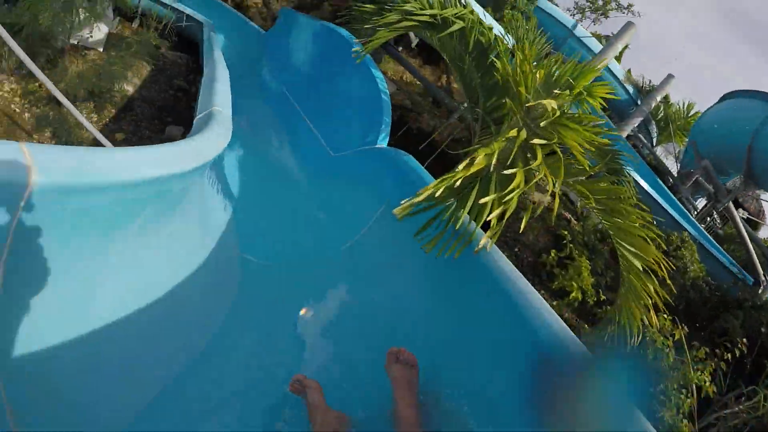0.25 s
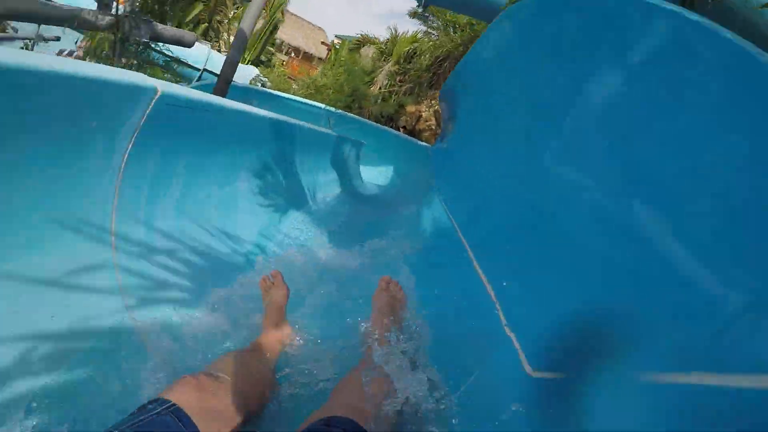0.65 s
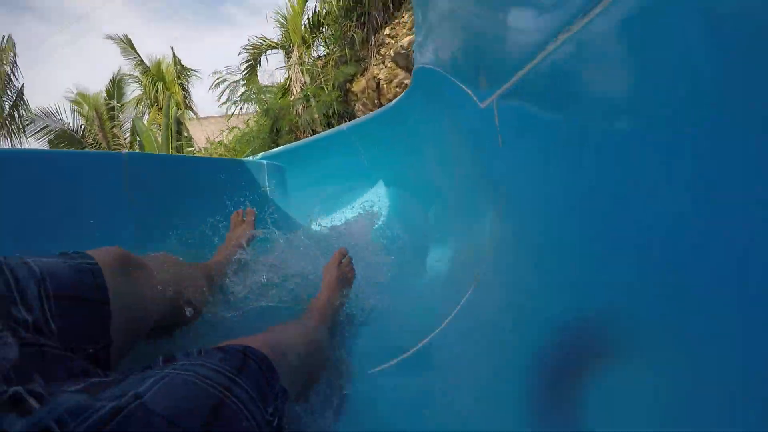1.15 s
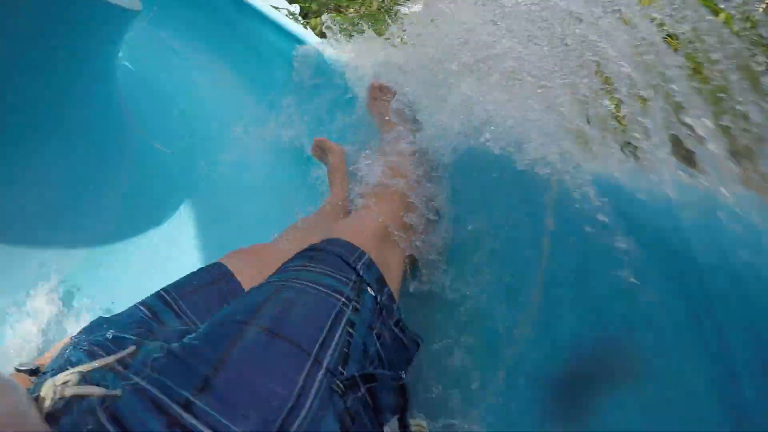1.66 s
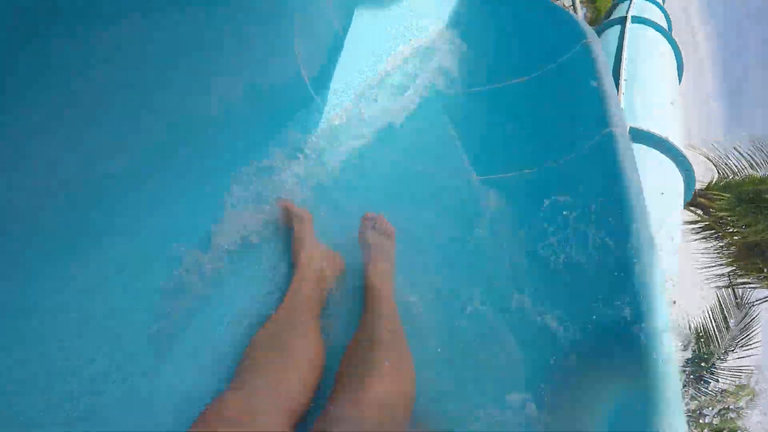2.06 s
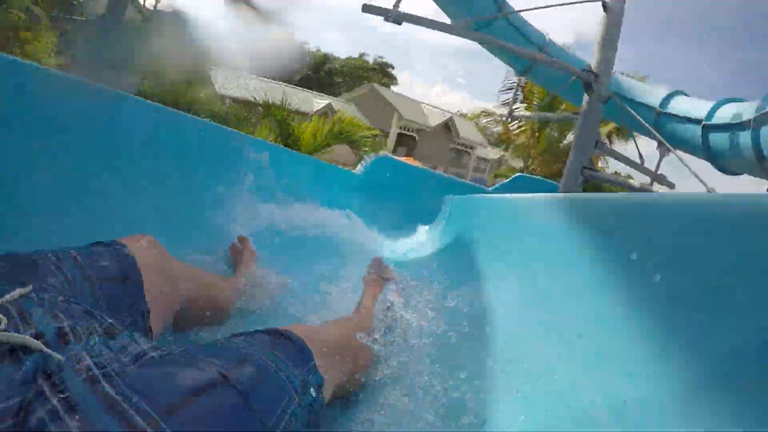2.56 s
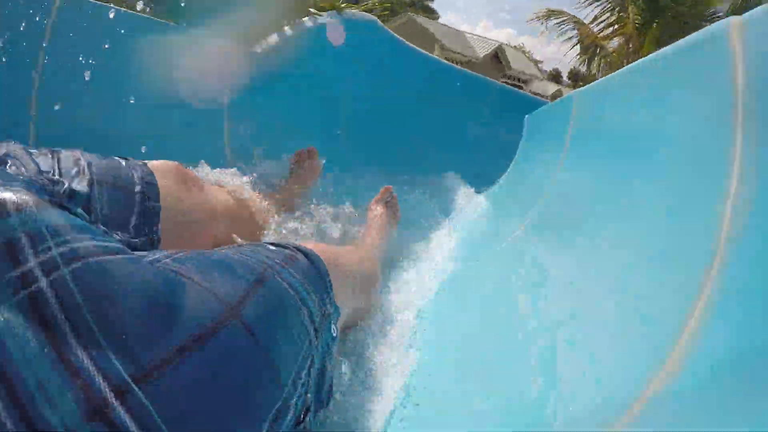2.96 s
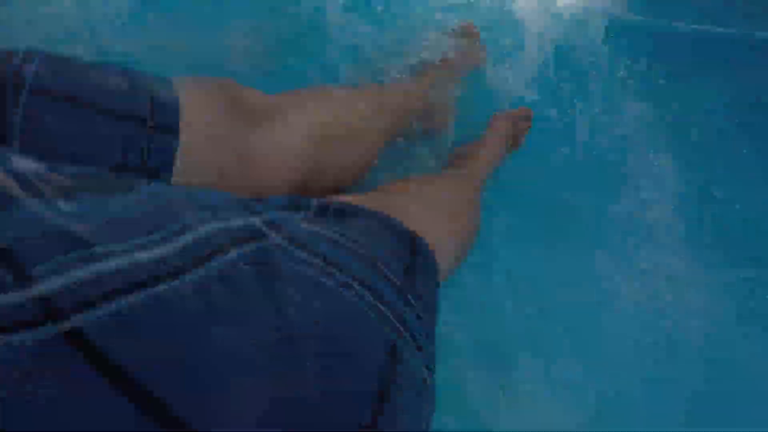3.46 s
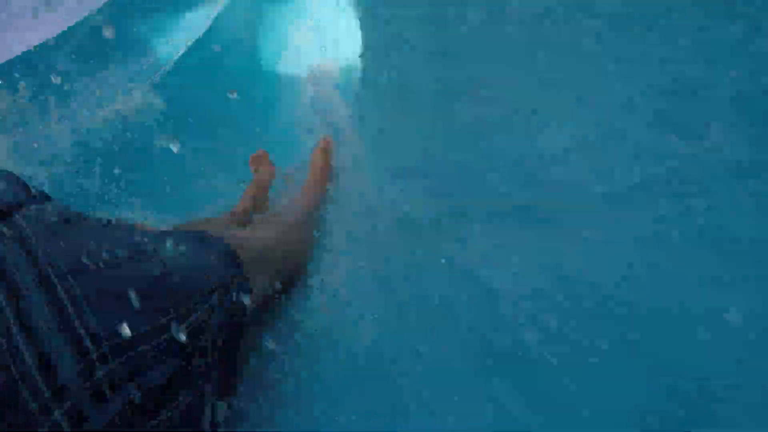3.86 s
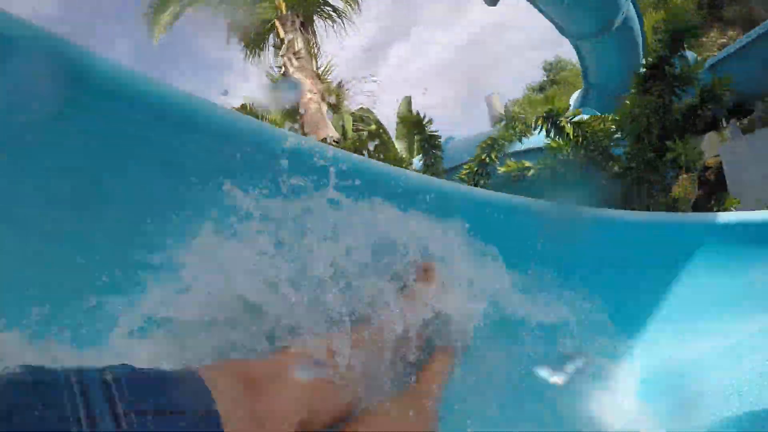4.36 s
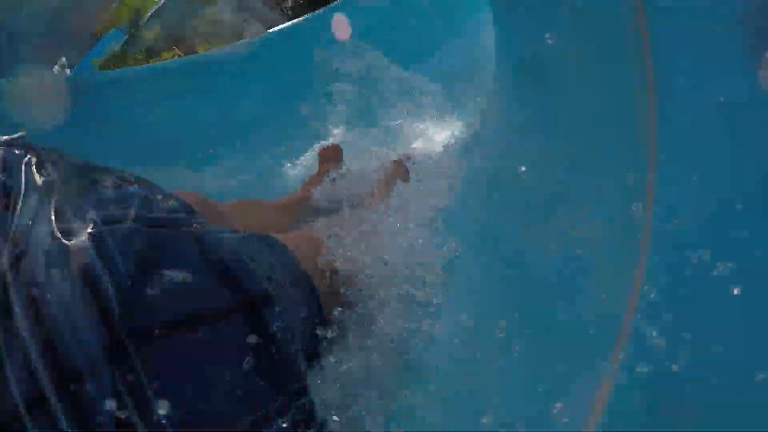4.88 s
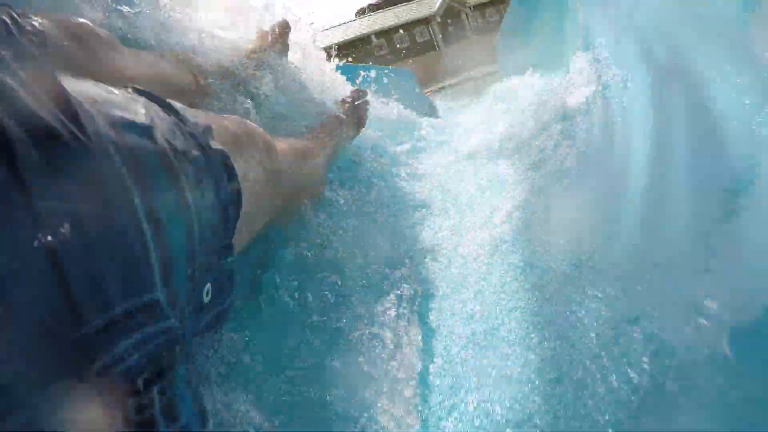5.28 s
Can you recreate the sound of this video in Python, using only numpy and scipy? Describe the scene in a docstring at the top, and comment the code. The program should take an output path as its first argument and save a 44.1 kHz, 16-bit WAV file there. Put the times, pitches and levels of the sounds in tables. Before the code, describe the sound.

Water rushes and churns around a rider on an open water slide for about five and a half seconds, heard very close through a waterproof camera housing. A fizzing hiss, a low gurgle and fine spray swell in the bends, over rumbling wind gusts and irregular deep thumps that set the trough booming. It starts moderately, then surges at 1 second with a splash and a run of heavy thumps lasting until 1.7. After a dip, another surge with thumps, splashes and a gust comes at 2.4. The water eases, with a few knocks around 3.1, then peaks at 3.6 with hard splashes, thumps and one sharp, bright crack. From 3.8 to 3.9 the water is briefly muffled. Drops snap and plink on the housing from 4 to 4.2. The rush continues with soft low thumps around 4.6 and 5, and a last thump and splash near 5.4.

```python
"""Water rushes, churns and sprays around the legs of a rider shooting feet first down an open water slide.
The microphone rides along at arm's length or less, inside a hand-held camera's waterproof housing.
Moving air buffets the shell, water and gusts thump it, splashes break on it and drops crack against it.
The fibreglass trough booms just below, and for a moment a film of water muffles the rush and churn."""
import sys
import numpy as np
from scipy import signal
from scipy.fft import rfft, irfft, next_fast_len
from scipy.io import wavfile
from scipy.ndimage import uniform_filter1d, map_coordinates

SR = 44100
rng = np.random.default_rng(int(sys.argv[2]) if len(sys.argv) > 2 else 0)


def put_to_file(sound):
    """Save the sound as 16-bit audio at rate SR, in the file named by the first command-line argument."""
    columns = np.atleast_2d(sound).T  # one column per channel
    safe = np.clip(columns, -1, 1)
    whole_steps = np.round(safe * 32767)
    wavfile.write(sys.argv[1], SR, whole_steps.astype(np.int16))


N = 243431


def amp(db):
    """Decibels to gain."""
    return 10 ** (np.asarray(db) / 20)


def unit(x):
    """x at rms 1."""
    return x / np.sqrt(np.mean(x ** 2) + 1e-20)


def shape(points, hz):
    """Gain of (Hz, dB) points joined on a log axis."""
    f, db = np.transpose(points)
    return amp(np.interp(np.log(hz + 1), np.log(f + 1), db))


def curve(rows):
    """(seconds, value) points joined into one value per sample."""
    return np.interp(np.arange(N) / SR, *np.transpose(rows))


def wobble(rate):
    """A smooth random curve, rate knots a second."""
    return map_coordinates(rng.standard_normal(int(N * rate / SR) + 4), [np.arange(N) * rate / SR])


def filtered(x, response):
    """x times a response of frequency."""
    m = next_fast_len(len(x) + SR // 8)
    return irfft(rfft(x, m) * response(np.fft.rfftfreq(m, 1 / SR)), m)[:len(x)]


def resonances(modes, hz):
    """Response of (Hz, width, dB) modes on top of what passes straight through."""
    return 1 + sum(amp(db) * 1j * hz * width / (centre ** 2 - hz ** 2 + 1j * hz * width)
                   for centre, width, db in modes)


def add(track, start, sound):
    """Mix a sound into the track at start seconds."""
    room = track[max(round(start * SR), 0):][:len(sound)]
    room += sound[:len(room)]


# The trough, just under the rider. Each row: resonance in Hz, width in Hz, gain in dB.
TROUGH_MODES = [(215.2, 31.4, 4), (387, 70, -20)]

def trough(sound):
    """Low blows and churning set the fibreglass booming."""
    return filtered(sound, lambda hz: resonances(TROUGH_MODES, hz))


# The shell around the microphone. Each row: resonance in Hz, width in Hz, gain in dB.
HOUSING_MODES = [(1110, 460, -17), (2070, 110, -8), (3230, 400, -8.5), (4470, 580, -7), (6720, 160, -8.5),
                 (8010, 510, 1.5), (10660, 550, -8), (13100, 900, -1)]

def housing(hz):
    """The colour that the plastic shell gives to the water outside."""
    return np.abs(resonances(HOUSING_MODES, hz))


def hiss(spectrum, samples=N):
    """Water noise as heard from inside the housing, at rms 1."""
    return unit(filtered(rng.standard_normal(samples), lambda hz: shape(spectrum, hz) * housing(hz)))


# Gusts right on the housing. Each row: time in seconds, level in dB.
GUSTS = [(0, -26.5), (.35, -30.5), (.52, -18.5), (.8, -17), (.95, -27.5), (1.1, -11.5), (1.3, -23.5),
         (1.7, -18), (1.83, -31), (2.2, -27.5), (2.48, -12.5), (2.65, -33), (3.05, -31.5), (3.62, -12.5),
         (3.86, -37), (4.17, -18.5), (4.32, -44), (4.65, -16), (4.9, -30), (5.52, -19)]
# Their rumble at the microphone. Each row: frequency in Hz, relative level in dB.
BUFFET_SPECTRUM = [(10, -30), (20, 0.5), (30, 4), (48, -7), (70, -15), (120, -31), (220, -42.5), (500, -79)]

def buffet(uneven_db=2.5):
    """Eddies of air roll over the housing as slow swings of pressure."""
    eddies = signal.hilbert(filtered(rng.standard_normal(N), lambda hz: shape(BUFFET_SPECTRUM, hz)))
    power = uniform_filter1d(np.abs(eddies) ** 2, size=SR // 16)
    steady_rumble = unit(eddies.real / np.sqrt(np.abs(power) + 1e-20))
    return amp(curve(GUSTS) + uneven_db * wobble(9)) * steady_rumble


# Low thumps on the housing: quick knocks of water and slow, soft whumps of air.
# Each row: start in seconds, level in dB, first pitch in Hz.
THUMPS = [(.115, -20.5, 125), (0.476, -11.5, 86.4), (0.726, -5, 59), (.775, -7, 70), (1.032, 2, 172),
          (1.289, 2.5, 159), (1.395, 0.5, 146), (1.405, -3, 50.3), (1.546, 0.5, 76), (1.727, -4.5, 45),
          (2.388, -1.5, 80), (2.403, 1.5, 152), (2.793, -24.5, 230), (3.105, -21, 191), (3.115, -1, 59),
          (3.203, -9.5, 124), (3.331, -5, 40), (3.572, -1, 76), (3.604, -2, 117), (3.702, 1.5, 153),
          (3.788, -4.5, 212), (3.929, -14, 151), (4.017, -10.5, 140), (4.167, -6.5, 126), (4.19, -2, 45.7),
          (4.585, 2, 40.3), (4.733, -1.5, 37.4), (5.028, -10, 200), (5.044, 0, 43), (5.369, 2, 37.3)]

def thumps(relaxed_hz=34.6, scatter_octaves=0.15, sag_s=0.0062, slow_t60=0.22, rise_cycles=0.24):
    """Each thump is a push that relaxes: a low swing whose pitch falls quickly."""
    out, t = np.zeros(N), np.arange(SR // 4) / SR
    for start, db, first_hz in THUMPS:
        last_hz = relaxed_hz * 2 ** (scatter_octaves * rng.standard_normal())
        hz = last_hz + (first_hz - last_hz) * np.exp(-t / sag_s)
        t60 = slow_t60 / (1 + (first_hz / 158) ** 3)  # a quick push at 158 Hz lasts half as long
        swell = 1 - np.exp(-t * first_hz / rise_cycles)  # slow pushes start softly
        add(out, start, amp(db - 60 * t / t60) * swell * np.sin(2 * np.pi * np.cumsum(hz) / SR))
    return out


# Splashes on the shell. Each row: start in seconds, level in dB, length in seconds, air pocket in Hz.
SPLASH_HITS = [(1.0318, -10.5, 0.0037, 523), (1.31, -19.5, 0.016, 655), (1.404, -20.5, 0.012, 1210),
               (1.623, -26.5, 0.019, 360), (1.742, -30.5, 0.011, 2420), (2.377, -25, 0.032, 3280),
               (2.403, -18.5, 0.01, 634), (2.442, -25.5, 0.03, 596), (2.506, -31.5, .017, 1900),
               (2.803, -37.5, 0.027, 555), (3.098, -30.5, 0.0053, 594), (3.199, -29.5, 0.0082, 340),
               (3.532, -28, 0.049, 1150), (3.6, -18, 0.0042, 1500), (3.611, -8, 0.0023, 655),
               (3.622, -7, 0.0032, 497), (3.665, -22, 0.021, 760), (3.705, -13.5, 0.0026, 570),
               (3.766, -30, 0.015, 820), (4.028, -22.5, .016, 1690), (4.06, -23, .009, 870),
               (4.17, -26, .012, 3220), (4.507, -34.5, 0.029, 645), (4.556, -29.5, 0.03, 3120),
               (4.607, -31.5, 0.012, 580), (4.824, -30.5, 0.07, 1370), (4.971, -33, 0.029, 1940),
               (5.39, -19, 0.011, 577), (5.436, -28, .014, 1930)]
# Their common colour, close up. Each row: frequency in Hz, relative level in dB.
SPLASH_SPECTRUM = [(120, 0.5), (220, 4.5), (330, -2), (520, -1), (850, -4), (1150, -6), (1550, -10.5),
                   (2200, -9.5), (2800, -19), (4500, -28.5), (9000, -38.5), (15000, -57)]

def splashes(rise_share=0.083, fall_power=0.86, pocket_db=8, pocket_octaves=0.28):
    """Water breaks in a burst coloured by the air it traps; finer jets trap less and are brighter."""
    out, t = np.zeros(N), np.arange(SR // 5) / SR
    for start, db, length, pocket_hz in SPLASH_HITS:
        tilt_db_per_octave = 2.5 * np.log2(pocket_hz / 754)

        def colour(hz):
            octaves = np.log2(np.clip(hz, 120, 8000) / pocket_hz)
            peak_db = pocket_db * np.exp(-(octaves / pocket_octaves) ** 2)
            return shape(SPLASH_SPECTRUM, hz) * amp(tilt_db_per_octave * octaves + peak_db)

        burst = filtered(rng.standard_normal(len(t)), colour)
        burst *= (1 - np.exp(-t / (rise_share * length))) * np.exp(-(t / length) ** fall_power)
        burst_rms = np.sqrt(np.sum(burst ** 2) / (length * SR))
        add(out, start, amp(db) * burst / burst_rms)
    return out


# Drops and bubbles bursting on the shell, centimetres from the microphone.
# Each row: start in seconds, relative level in dB, ring pitch in Hz, relative snap strength in dB.
DROP_HITS = [(.398, -17, 2860, -12), (.713, -28, 7400, -20), (1.0305, -11.5, 860, -10),
             (1.288, -8.5, 2080, -25), (1.289, -3.5, 626, -17), (1.745, -26.5, 2550, 3),
             (1.787, -22, 1200, -19), (2.071, -22.5, 640, -6), (2.381, -18, 2660, 0),
             (2.451, -12.5, 623, -27), (2.464, -16, 1150, -22), (3.56, -9.5, 1070, -26),
             (3.611, -1.5, 500, -14), (3.611, -10.5, 3600, -15), (3.6227, -8, 2300, -4.5),
             (4.052, -1.5, 2170, -11), (4.1608, -12, 7140, -1.5), (4.163, -5, 4550, -17),
             (4.165, -5, 970, -5.5), (4.1808, -13.5, 10250, 0.5), (4.1852, -2, 3630, -8),
             (4.192, -9, 4600, -8), (4.229, -14, 2180, -7), (5.395, -25.5, 10500, -5),
             (5.438, -15.5, 4000, -7.5)]
# The snap of a drop. Each row: frequency in Hz, relative level in dB.
SNAP_SPECTRUM = [(1000, 5), (5000, 4), (8000, -2.5), (12000, -13), (15500, -15)]

def drops(rise_share=0.05, snap_t60=0.0089, chirp=0.047, deep_snap_db=-26):
    """A drop snaps on the shell and its trapped air rings briefly, rising; big bubbles start softly."""
    out, t = np.zeros(N), np.arange(SR // 20) / SR
    for start, db, ring_hz, snap_db in DROP_HITS:
        t60 = 0.0087 * (1000 / ring_hz) ** 0.46  # smaller bubbles die sooner
        t60 *= 2 ** (snap_db / deep_snap_db)  # deep ones snap faintly and ring longer
        glide = 1 + chirp * np.minimum(t / t60, 1)
        ring = np.sin(2 * np.pi * ring_hz * t * glide) * amp(-60 * t / t60)
        snap = hiss(SNAP_SPECTRUM, len(t)) * amp(snap_db - 4 - 60 * t / snap_t60)
        attack = 1 - np.exp(-(t / (rise_share * t60)) ** 2)
        add(out, start, amp(db + 3.5) * attack * (ring + snap))
    return out


def crack(start_s=3.6222, db=-13, t60=0.0059):
    """One drop hits the microphone port squarely: a very short, bright snap."""
    out, t = np.zeros(N), np.arange(SR // 20) / SR
    snap = np.diff(rng.standard_normal(len(t) + 1))
    add(out, start_s, amp(db - 60 * t / t60) * unit(snap))
    return out


def film(on_s=3.795, off_s=3.93, edge_s=0.015, dip_db=-8.5):
    """The dip in gain as a film of water covers the microphone and is torn off again."""
    t = np.arange(N) / SR
    cover = np.clip(0.5 + np.minimum(t - on_s, off_s - t) / edge_s, 0, 1)
    return amp(dip_db * cover)


def bubbles(count, centre_hz, spread_octaves, cycles, size_db):
    """A cloud of short rising pings at rms 1; size_db makes a few large ones stand out."""
    when, pitch, size = rng.random((count, 3)).T[:, :, None]
    hz = np.minimum(centre_hz * 2 ** (spread_octaves * (2 * pitch - 1)), SR / 3)
    samples = np.arange(SR // 128)
    age = hz * samples / SR / cycles
    glide = 1 + 0.063 * np.minimum(age, 2)
    envelope = np.exp(-np.pi * age) * (1 - np.exp(-20 * age))
    gain = amp(size_db * np.minimum(-np.log(1 - size), 5))
    pings = gain * envelope * np.sin(2 * np.pi * cycles * age * glide)
    positions = (when * N).astype(int) + samples
    return unit(np.bincount(positions.ravel(), pings.ravel(), N)[:N])


# Spray flying off the legs towards the camera. Each row: frequency in Hz, relative level in dB.
SPRAY_SPECTRUM = [(4000, -30), (7000, -9), (10500, 11.5), (13000, 4.5), (15500, -8)]

def spray(swell_db, cruise_db=-63, growth=1.1):
    """Fine spray: a high, flickering hiss that grows a little faster than the flow."""
    return amp(cruise_db + growth * swell_db + 1.7 * wobble(300)) * hiss(SPRAY_SPECTRUM)


# How deep the heels plough, a leg's length ahead. Each row: time in seconds, extra churn in dB.
HEEL_DEPTH = [(0, 0.5), (.25, -3.5), (.75, 4), (1.15, 2), (1.7, 2.5), (1.9, -3.5), (2.3, 1.5), (2.65, -1),
              (2.85, 0.5), (4.6, -2.5), (5.52, 1)]
# The water they turn over. Each row: frequency in Hz, relative level in dB.
CHURN_SPECTRUM = [(40, 4.5), (90, 8.5), (200, -6.5), (300, -3.5), (550, -2.5), (800, -3), (1100, 3),
                  (1500, -12), (2500, -31.5)]

def churn(swell_db, cruise_db=-41.5, growth=0.77):
    """The heels plough the water into a low roar with gurgling bubbles."""
    gurgle = bubbles(count=1500, centre_hz=878, spread_octaves=1.096, cycles=8, size_db=0)
    level_db = cruise_db + growth * swell_db + curve(HEEL_DEPTH) + 0.56 * wobble(24.79)
    return amp(level_db) * (hiss(CHURN_SPECTRUM) + amp(-8) * gurgle)


# Water running round the legs, close to the camera. Each row: frequency in Hz, relative level in dB.
RUSH_SPECTRUM = [(410, -5.5), (700, -6), (757, -16), (1090, -2), (1540, -8), (1780, -3), (2340, -5.5),
                 (3230, -6), (4410, -8), (5150, -14), (6500, -14), (8210, -23), (9470, -25.5),
                 (13100, -38.5), (15500, -42)]

def rush(flow_db):
    """Fast water makes a broad hiss with small bubbles fizzing in it."""
    cloud = bubbles(count=7000, centre_hz=3130, spread_octaves=1.324, cycles=6.7, size_db=10.5)
    fizz = unit(filtered(cloud, housing))
    return amp(flow_db + 2.32) * (hiss(RUSH_SPECTRUM) + amp(-12.5) * fizz)


# How hard the water runs past the rider, swelling in each bend of the slide.
# Each row: time in seconds, relative level in dB.
FLOW_LEVELS = [(0.0, -41), (0.3, -45), (0.46, -40), (1.04, -36), (1.62, -41.5), (1.72, -39.5),
               (1.92, -48.5), (2.42, -34.5), (2.58, -48.5), (3.14, -45), (3.56, -31.0), (3.86, -47.5),
               (4.04, -38.5), (4.46, -39.5), (4.52, -36.5), (5.24, -43.5), (5.44, -41.5), (5.52, -43)]

def water(cruise_db=-42.5):
    """Rush, churn and spray all grow with the flow and surge together a little."""
    flow_db = curve(FLOW_LEVELS)
    swell_db = flow_db - cruise_db  # against cruising down a straight stretch
    surge_db = 0.5 * wobble(26) + wobble(70)
    body = film() * (rush(flow_db) + churn(swell_db))
    return amp(surge_db) * (body + spray(swell_db))


def scene():
    """Everything as it reaches the one microphone, riding just above the trough."""
    booming = trough(water() + buffet() + thumps() + splashes())
    return (booming + drops() + crack())[None]


def record(dry):
    """The camera rounds off the largest swings and keeps nothing above its band limit."""
    ceiling, hardness, top_hz = 0.93, 6, 15500
    rounded = dry[0] / (1 + np.abs(dry[0] / ceiling) ** hardness) ** (1 / hardness)
    return filtered(rounded, lambda hz: 1 / (1 + (hz / top_hz) ** 160))[None]


dry = scene()
out = record(dry)
put_to_file(out)
```